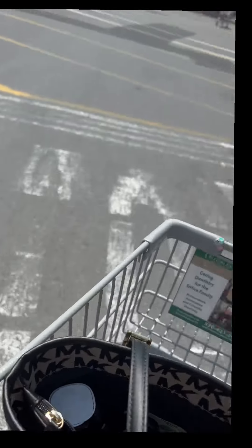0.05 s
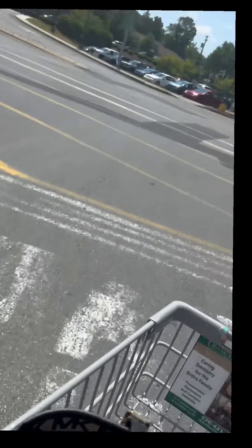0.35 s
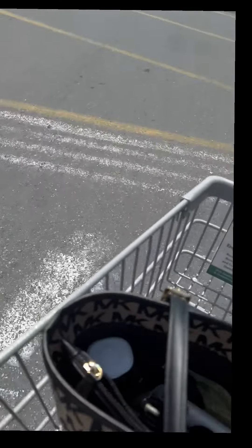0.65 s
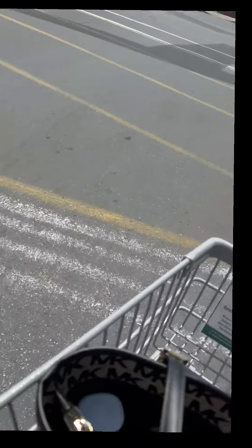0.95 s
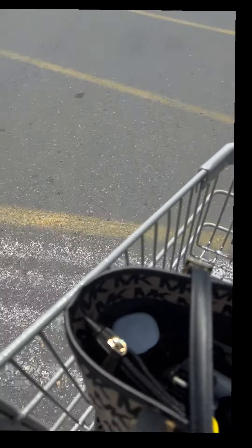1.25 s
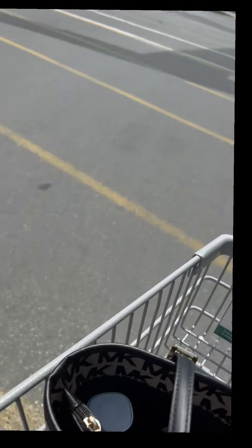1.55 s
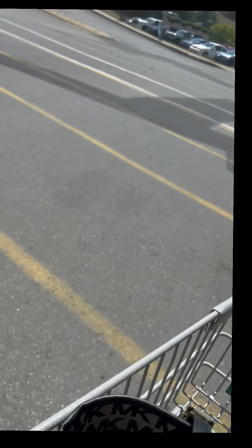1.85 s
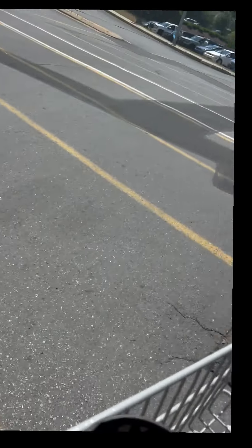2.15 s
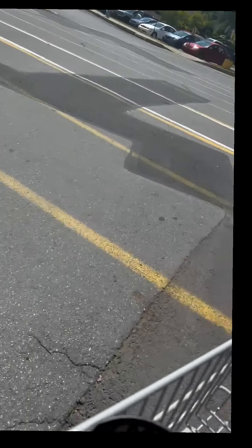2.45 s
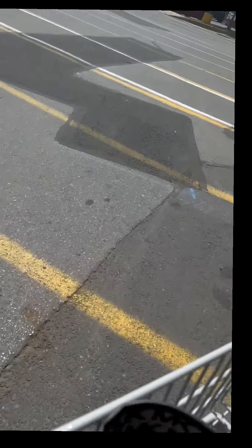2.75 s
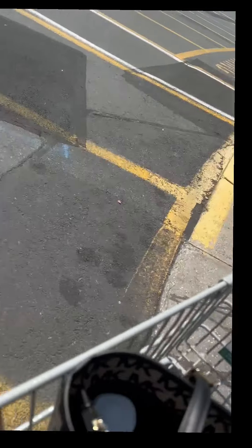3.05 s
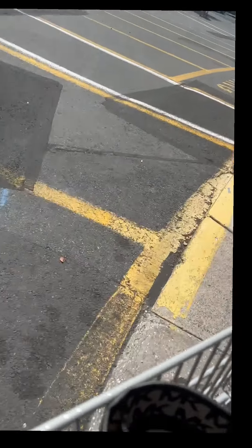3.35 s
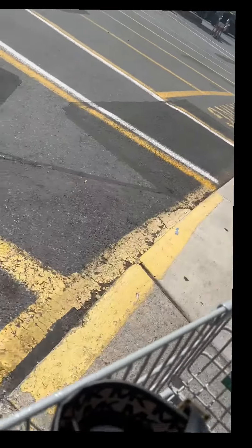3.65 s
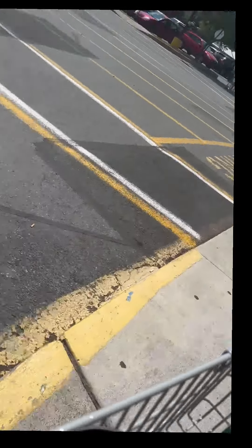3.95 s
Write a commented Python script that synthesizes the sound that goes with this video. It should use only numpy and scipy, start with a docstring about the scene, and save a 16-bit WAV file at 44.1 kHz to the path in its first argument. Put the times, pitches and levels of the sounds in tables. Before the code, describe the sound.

A wire shopping cart rattles close by over rough asphalt, its basket jingling above rumbling, humming wheels. Cracks jolt it into louder clatter and hollow thumps, then it slows with a short rising moan. Light wind brushes the microphone.

```python
"""Loose wires chatter and jingle as a wire shopping cart is pushed over rough asphalt.
Grit shakes the basket; cracks jolt it into ringing rattles, thump the cart body and clack the casters.
The hard wheels rumble through the frame and hum with their speed. A light wind brushes the
microphone just above the handle. At the end the cart slows with a short rising moan."""
import sys
import numpy as np
from scipy import signal
from scipy.fft import rfft, irfft
from scipy.io import wavfile

SR = 44100
rng = np.random.default_rng(int(sys.argv[2]) if len(sys.argv) > 2 else 0)


def persist_wave(psi):
    """Save psi, clipped to +-1, as 16-bit WAV."""
    counts = np.round(np.clip(psi, -1, 1) * 32767).astype(np.int16)
    wavfile.write(sys.argv[1], SR, np.atleast_2d(counts).T)


N = 176400

# Spectrum of wire clashing on wire. Each row: frequency in Hz, relative density in dB.
CLASH_SPECTRUM = [(700, -57), (1500, -16), (2050, -9), (2700, -13.5), (2950, -4.5), (3850, -5.5),
                  (4200, -5), (4700, -1.5), (5350, -6.5), (5700, -3), (6900, 1.5), (7300, -1.5),
                  (8400, -10.5), (9400, -10), (9900, -4), (11500, -7), (13200, -6.5), (14100, -11.5),
                  (15600, -15)]
# Basket wire resonances. Each row: frequency in Hz, relative level in dB, t60 in seconds.
BASKET_MODES = [(3200, -9, .035), (4125, -2, .06), (4250, -1, .05), (4460, -4, .06), (4650, -7, .05),
                (4850, -8, .04), (5770, -5.5, .07), (6220, -7, .04), (8740, -17, .15), (9120, -16, .16),
                (10890, -13, .14), (11470, -14, .12), (11820, -15, .15), (11980, -10.5, .1)]


def undb(db):
    """Decibels to gain."""
    return 10 ** (np.asarray(db) / 20)


def unit(x):
    """Scale to rms 1."""
    return x / np.sqrt(np.mean(x ** 2) + 1e-18)


def curve(table, column=1):
    """One column of a time table at every sample."""
    rows = np.array(table, float)
    return np.interp(np.arange(N) / SR, rows[:, 0], rows[:, column])


def per_bin(table):
    """A (Hz, value) table at every FFT bin, interpolated in log frequency."""
    rows = np.array(table, float)
    bin_hz = np.arange(N // 2 + 1) * SR / N
    return np.interp(np.log(bin_hz + 1e-9), np.log(rows[:, 0]), rows[:, 1])


def colour(x, spectrum):
    """Minimum-phase filter with the given (Hz, dB) spectrum."""
    cepstrum = irfft(np.log(undb(per_bin(spectrum))), N)
    cepstrum[1:N // 2] *= 2
    cepstrum[N // 2 + 1:] = 0
    response = irfft(np.exp(rfft(cepstrum)), N)[None, :4096]
    return signal.fftconvolve(x, response, axes=1)[:, :N]


def shaped(x, spectrum):
    """Colour a sound, keeping its rms."""
    return unit(colour(x, spectrum)) * np.sqrt(np.mean(x ** 2))


def walk(rate_hz):
    """Random drift, rms 1, with rate_hz new values a second."""
    steps = rng.standard_normal(4096)
    return unit(np.interp(np.arange(N) / SR * rate_hz, np.arange(len(steps)), steps))


def impacts(per_s, spread_db):
    """Randomly timed pushes of uneven size and sign, rms 1."""
    chance, size = rng.random(N), rng.standard_normal(N)
    return unit((chance < per_s / SR) * undb(spread_db * np.minimum(size, 2)) * rng.choice([-1, 1], N))


def strike(pushes, response):
    """Play pushes through a mid/side response."""
    return signal.oaconvolve(pushes[None], response, axes=1)[:, :N]


def add(out, start_s, sound):
    """Mix a mid/side sound in at start_s."""
    room = out[:, int(start_s * SR):][:, :sound.shape[1]]
    room += sound[:, :room.shape[1]]


def dense_body(t60_s):
    """Mid/side response of a part with countless short modes, energy 1 in each."""
    t = np.arange(SR // 10) / SR
    ring = rng.standard_normal((2, len(t))) * np.exp(-np.log(1000) * t / t60_s)
    return ring / np.sqrt(np.sum(ring ** 2, axis=1, keepdims=True))


def mode(hz, t60_s):
    """One ringing mode, mid and side a quarter cycle apart, energy 1 in each."""
    t = np.arange(SR // 8) / SR
    ring = np.exp(-np.log(1000) * t / t60_s) * np.cos(2 * np.pi * hz * t + np.array([[0], [np.pi / 2]]))
    return ring / np.sqrt(np.sum(ring ** 2, axis=1, keepdims=True))


def jingle(modes, force):
    """Each mode is struck at its own random moments."""
    ring = sum(undb(db) * strike(force * impacts(per_s=130, spread_db=3.5), mode(hz, t60_s))
               for hz, db, t60_s in modes)
    return ring / np.sqrt(sum(undb(db) ** 2 for _, db, _ in modes))


def blows(hits, modes):
    """Single blows ring all of a part's modes together; mono."""
    out = np.zeros((2, N))
    ring = sum(undb(db) * mode(hz, t60_s) for hz, db, t60_s in modes)
    for start_s, db in hits:
        add(out, start_s, undb(db) * ring)
    return out[0]


def unsteady_tone(track, waver=0.0086, flicker_db=1.5):
    """Phase and gain along a (seconds, Hz, dB) track; both waver slightly."""
    hz = curve(track) * (1 + waver * walk(34.15))
    gain = undb(curve(track, column=2) + flicker_db * walk(30))
    return 2 * np.pi * np.cumsum(hz) / SR, gain


def basket(parts=8, chatter_db=0.86, drift_db=2.5, tint_db=2):
    """Shaken loose parts take turns clashing, each in its own bands, while the wires ring."""
    # Shaking from the ground. Each row: time in seconds, relative level in dB.
    shake = [(0.0, -24), (0.05, -27.5), (0.09, -24.5), (0.35, -31.5), (0.365, -23.5), (0.47, -26.5),
             (0.66, -26), (0.72, -22.5), (0.86, -28), (0.88, -25), (1.04, -26), (1.09, -30.5),
             (1.28, -26.5), (1.31, -32), (1.37, -23), (1.4, -29.5), (1.55, -25.5), (1.57, -33), (1.6, -33),
             (1.69, -25.5), (1.75, -28), (1.76, -25), (1.79, -29.5), (1.88, -29.5), (1.89, -24),
             (1.95, -26), (2.19, -26.5), (2.22, -23), (2.42, -24.5), (2.45, -31), (2.51, -23), (2.58, -32),
             (2.6, -26), (2.66, -22), (2.78, -23.5), (2.828, -25), (2.838, -20.5), (2.93, -20),
             (2.95, -24.5), (2.99, -16.5), (3.02, -21.5), (3.24, -23), (3.33, -31), (3.45, -26.5),
             (3.495, -31), (3.508, -21.5), (3.57, -24.5), (3.62, -29), (3.65, -37), (3.68, -28),
             (3.7, -36.5), (3.78, -27.5), (3.82, -37), (3.85, -30.5), (3.91, -35), (3.94, -44),
             (4.0, -43.5)]
    force = undb(curve(shake) + chatter_db * walk(70))
    tints = rng.standard_normal((parts, len(CLASH_SPECTRUM)))
    clash = 0
    for tint in tints - tints.mean(axis=0):
        hits = unit(impacts(per_s=190, spread_db=1) * undb(drift_db * walk(25.18)))
        hits = (hits * force + jolts()) / np.sqrt(parts)
        spectrum = [(hz, db + tint_db * k) for (hz, db), k in zip(CLASH_SPECTRUM, tint)]
        clash = clash + shaped(strike(hits, dense_body(t60_s=0.036)), spectrum)
    return undb(2.5) * clash + undb(-7) * jingle(BASKET_MODES, force) + pings(force) + rattles()


def pings(force, per_s=50, low_hz=4000, high_hz=6100, gain_db=21, spread_db=3):
    """Thin wires ring briefly, at a pitch set by where they are touched."""
    out = np.zeros((2, N))
    for when, where, size in rng.random((int(per_s * N / SR), 3)):
        gain = force[int(when * N)] * undb(gain_db + spread_db * (2 * size - 1))
        add(out, when * N / SR, gain * mode(low_hz + where * (high_hz - low_hz), t60_s=.08))
    return shaped(out, CLASH_SPECTRUM)


def casters(count=4, patches_per_s=20, patch_db=3):
    """Casters knock in their forks and ring them, over rough and smooth patches and cracks."""
    # Knocking force. Each row: time in seconds, relative level in dB.
    knocking = [(0.0, -36.5), (0.32, -41), (0.49, -36), (0.51, -39), (1.02, -35.5), (1.05, -39),
                (1.27, -42.5), (1.3, -48), (1.44, -37.5), (1.64, -45), (1.69, -36), (1.82, -43.5),
                (2.24, -37), (2.85, -39), (2.91, -28), (2.95, -36.5), (3.2, -36.5), (3.48, -39.5),
                (3.54, -32.5), (3.63, -40.5), (3.78, -38), (4.0, -42.5)]
    # Knock spectrum. Each row: frequency in Hz, relative density in dB.
    spectrum = [(300, -33), (600, 2.5), (760, 2.5), (920, -3), (1100, 1.5), (1280, 1), (1420, 2.5),
                (1900, -2.5), (2600, -11.5), (5000, -26)]
    # Fork resonances. Each row: frequency in Hz, relative level in dB, t60 in seconds.
    fork_modes = [(358, 3, .1), (410, 2, .07), (507, 1.5, .08), (662, -3, .08), (760, -2.5, .08),
                  (1110, 0, .06), (1417, -4, .07)]
    force = undb(curve(knocking))
    patchy_force = force * unit(undb(patch_db * walk(patches_per_s)))
    knocks = 0
    for _ in range(count):
        hits = patchy_force * impacts(per_s=200, spread_db=3.5) + undb(-20) * jolts()
        knocks = knocks + strike(hits, dense_body(t60_s=0.051))
    return undb(4) * shaped(knocks / np.sqrt(count), spectrum) + undb(3) * jingle(fork_modes, force)


def rolling(parts=6):
    """Coarse grit drums through the frame, jolts thump it; fine grain makes a steady low drone."""
    # Rumble envelope. Each row: time in seconds, relative level in dB.
    roll = [(0.0, -29), (0.02, -34), (0.32, -35.5), (0.65, -34), (1.65, -33.5), (2.61, -32), (2.66, -46),
            (2.73, -30.5), (3.26, -31.5), (3.27, -34), (3.88, -39.5), (4.0, -33)]
    # Spectra of frame rumble and wheel drone. Each row: frequency in Hz, relative density in dB.
    frame_spectrum = [(100, -32), (190, 3), (260, 3.5), (400, 1), (470, -2.5), (540, 1), (620, -11),
                      (900, -11.5), (2000, -42.5)]
    drone_spectrum = [(20, -66), (42, -26), (62, -7), (85, 2.5), (125, 1.5), (160, -1.5), (215, 3),
                      (280, -12), (600, -28.5)]
    drone = unit(colour(rng.standard_normal((2, N)), drone_spectrum))
    thumps = strike(jolts(landings=1), mode(hz=215, t60_s=0.031))
    grit = sum(strike(impacts(per_s=250, spread_db=1.5), dense_body(t60_s=0.046)) for _ in range(parts))
    rumble = undb(curve(roll) + 0.5) * shaped(unit(grit), frame_spectrum)
    return rumble + undb(-35.5) * drone + undb(3) * thumps


def wheel_hum(pitch_multiple=3, drift_db=0.33):
    """Two worn treads hum on multiples of a rate that follows each wheel's speed."""
    # Hum tracks. Each row: time in seconds, pitch of the strongest partial in Hz, level in dB.
    loudest_wheel = [(0, 146.4, -38), (.22, 150.8, -34), (.36, 172, -27), (.5, 179, -37.5),
                     (.66, 175.6, -29), (.75, 175.5, -27), (.82, 173.8, -50), (.98, 165, -32),
                     (1.12, 166, -36), (1.25, 167, -26.5), (1.42, 148.2, -40.5), (1.64, 133.7, -32.5),
                     (1.8, 132, -33.5), (2.02, 155.4, -35.5), (2.22, 157.6, -31.5), (2.3, 161, -40),
                     (2.37, 163, -26), (2.44, 164, -39), (2.5, 166, -26), (2.59, 165.4, -40),
                     (2.7, 168, -28.5), (2.85, 163.1, -40), (3.2, 156, -39), (3.34, 157.4, -27.5),
                     (3.42, 152, -50), (3.7, 116, -50), (3.86, 118.2, -32), (4, 123.6, -45)]
    second_wheel = [(1.35, 200.7, -58), (1.56, 191.8, -30.5), (1.72, 176.8, -38), (1.84, 181.8, -28),
                    (1.96, 200.6, -37.5), (2.3, 194.4, -37.5), (2.8, 199.7, -42), (2.87, 198, -30),
                    (2.93, 186.2, -35), (3.12, 185, -31.5), (3.37, 206.6, -43), (3.415, 204, -26),
                    (3.445, 201, -27.5), (3.48, 198, -62)]
    # Tread ripples. Each row: multiple of the tread rate, relative level in dB.
    tread = [(2, -15), (3, 0), (4, -11)]
    hum = np.zeros(N)
    for track in (loudest_wheel, second_wheel):
        phase, gain = unsteady_tone(track)
        for multiple, db in tread:
            partial_gain = gain * undb(db + drift_db * walk(10))
            hum += partial_gain * np.sin(multiple * phase / pitch_multiple + 2 * np.pi * rng.random())
    return hum


def wind(level_db=-49.5, flutter_db=3, gust_at_s=2.53, gust_width_s=0.31, gust_db=7.5):
    """A breeze with one gust brushes the microphone; independent noise left and right."""
    # Wind spectrum. Each row: frequency in Hz, relative density in dB.
    spectrum = [(20, -19), (50, -3), (70, 6), (130, -5), (300, -26), (1000, -36)]
    gust = np.exp(-((np.arange(N) / SR - gust_at_s) / gust_width_s) ** 2)
    gain = undb(level_db + gust_db * gust + flutter_db * walk(3.7))
    return gain * unit(colour(rng.standard_normal((2, N)), spectrum))


def jolts(landings=4, max_gap_s=.007, gain_db=6, bounce_loss_db=1.5):
    """Pushes from a loose part that each crack throws up; it lands and bounces."""
    # Cracks and stones. Each row: start in seconds, relative peak in dB.
    cracks = [(0.1386, -17), (0.363, -24), (1.8924, -23), (2.2198, -15), (2.8345, -7), (2.8704, -25),
              (2.8871, -12.5), (2.9063, -15), (2.922, -23), (2.9775, -29), (3.5037, -15)]
    out = np.zeros(N)
    for (start_s, db), gaps in zip(cracks, rng.random((len(cracks), landings))):
        landing_s = start_s + max_gap_s * (np.cumsum(gaps) - gaps[0] / 2)
        at = np.clip((landing_s * SR).astype(int), 0, N - 1)
        out[at] += undb(db + gain_db - bounce_loss_db * np.arange(landings))
    return out


def rattles(touches=4, gain_db=5.5, tint_db=4, detune=.008):
    """A bump makes the stoutest wires strike; each touch favours other wires and bends their pitch."""
    # Rattle bursts. Each row: start in seconds, length in seconds, relative level in dB.
    bursts = [(0.358, .05, -9), (0.871, 0.036, -19.5), (1.364, 0.022, -20), (2.218, 0.0085, -10.5),
              (2.834, 0.019, -12.5), (2.887, 0.056, -10), (2.989, .015, -14)]
    stout_wires = BASKET_MODES[1:8]
    out = np.zeros((2, N))
    for start_s, length_s, db in bursts:
        jitter = rng.random(touches)
        jitter[0] = 0
        for at_s in start_s + length_s * (np.arange(touches) + jitter) / touches:
            ring = 0
            for hz, wire_db, t60_s in stout_wires:
                tint, bend, polarity = rng.uniform(-1, 1, 3)
                gain = np.sign(polarity) * undb(wire_db + tint_db * tint)
                ring = ring + gain * mode(hz * (1 + detune * bend), t60_s)
            add(out, at_s, undb(db + gain_db) * ring)
    return out


def caster_clacks():
    """A caster hits a stone and its axle rings sharply."""
    # Stone hits. Each row: start in seconds, relative level in dB.
    hits = [(0.365, -38), (1.013, -31), (2.209, -30), (2.751, -35), (2.926, -38), (3.058, -31), (3.54, -31)]
    # Axle resonances. Each row: frequency in Hz, relative level in dB, t60 in seconds.
    axle_modes = [(1105, 0, .08), (1165, -2, .06)]
    return undb(18.5) * blows(hits, axle_modes)


def body_thumps():
    """Broken pavement knocks hollow thumps out of the cart body."""
    # Blows on the body. Each row: start in seconds, relative level in dB.
    hits = [(2.834, -28), (2.864, -24), (2.923, -27), (3.086, -25.5), (3.153, -28), (3.177, -18),
            (3.203, -24), (3.255, -30)]
    # Body resonances. Each row: frequency in Hz, relative level in dB, t60 in seconds.
    body_modes = [(290, -2, .06), (362, 0, .08), (440, -3, .06), (515, -2, .06)]
    return undb(14.5) * blows(hits, body_modes)


def moan():
    """A nearly pure tone rises and swells as the cart slows."""
    # Moan track. Each row: time in seconds, pitch in Hz, level in dB.
    track = [(3.78, 405, -65), (3.9, 427, -38), (3.98, 434, -33.5), (4, 442, -28)]
    phase, gain = unsteady_tone(track)
    return gain * np.sin(phase)


def scene():
    """The cart in stereo, its bass leaning left, plus wind."""
    # Left/right likeness. Each row: frequency in Hz, correlation before clipping.
    channel_likeness = [(60, 1), (150, -0.5), (300, 0.68), (500, 0.25), (700, -0.19), (1300, -0.83),
                        (2300, -0.012), (3100, 0.21), (4300, 0.37), (5200, -0.52), (6200, 0.4),
                        (7300, -1.41), (8200, 0.98), (9800, 0.26), (12200, -0.072), (14200, 0.12)]
    # Lean to the left. Each row: frequency in Hz, left minus right in dB.
    lean = [(60, -0.5), (110, 15), (180, 6), (260, 1), (500, 0)]
    mid, side = rfft(basket() + casters() + rolling())
    centred = wheel_hum() + caster_clacks() + body_thumps() + moan()
    likeness = np.clip(per_bin(channel_likeness), -.95, .95)
    mid = mid * np.sqrt((1 + likeness) / 2) + rfft(centred)
    side = side * np.sqrt((1 - likeness) / 2)
    left_right = np.array([[1], [-1]])
    balance = undb(left_right * per_bin(lean) / 2)
    return irfft((mid + left_right * side) * balance, N) + wind()


def record(dry):
    """Steep low-pass on the top treble."""
    cutoff_hz = 15600
    return signal.sosfilt(signal.ellip(14, .2, 80, cutoff_hz, fs=SR, output="sos"), dry)


dry = scene()
out = record(dry)
persist_wave(out)
```